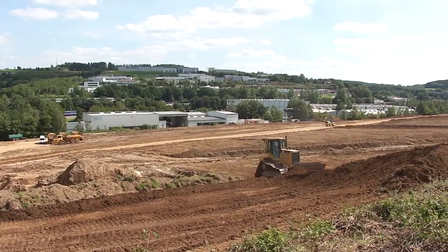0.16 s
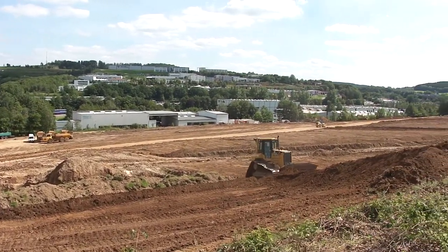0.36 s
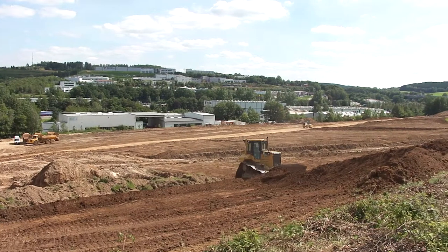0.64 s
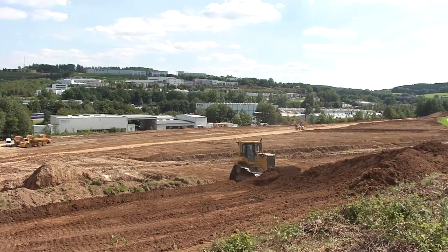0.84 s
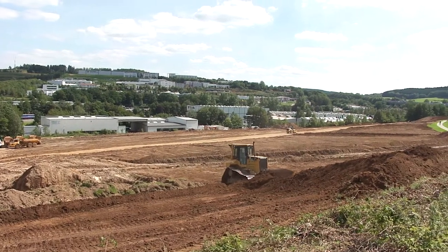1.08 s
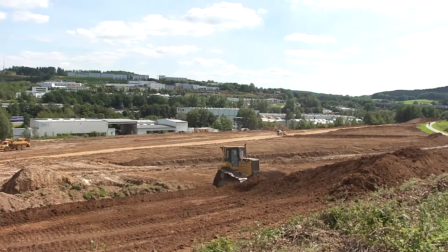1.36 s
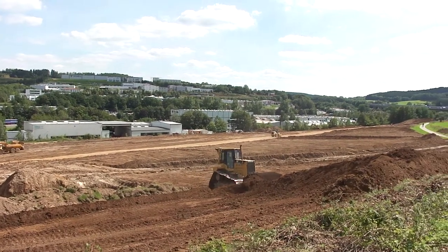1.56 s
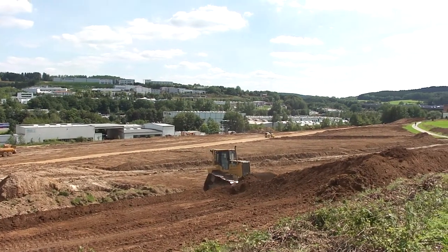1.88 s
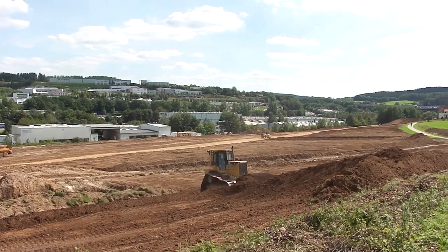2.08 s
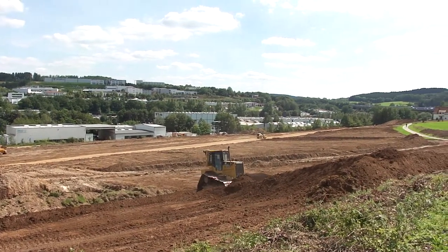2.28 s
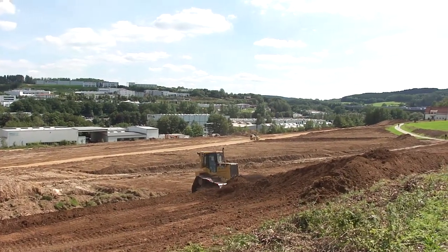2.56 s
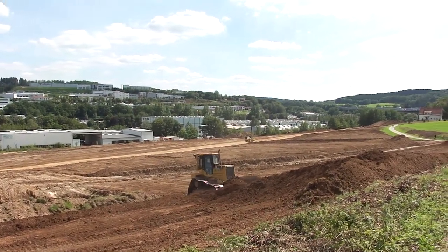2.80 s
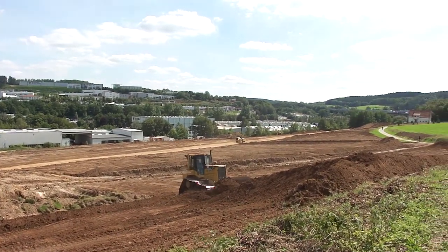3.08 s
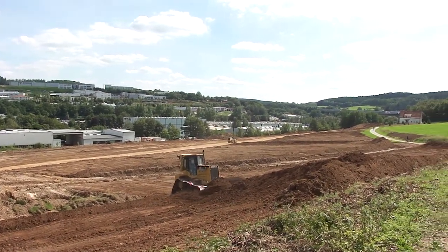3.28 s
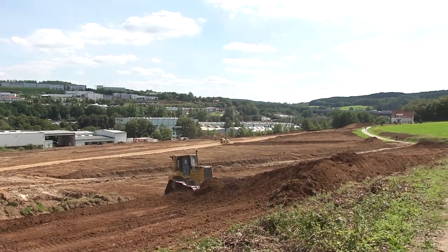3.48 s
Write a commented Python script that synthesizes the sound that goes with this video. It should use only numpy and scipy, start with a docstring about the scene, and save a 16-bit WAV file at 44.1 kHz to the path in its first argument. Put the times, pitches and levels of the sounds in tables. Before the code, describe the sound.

A bulldozer works throughout, some way off on open ground: a broad diesel roar with a slightly sagging low hum, clatter and airy hiss. From about 0.2 to 1.2 s the tracks give a rough groan sliding down in pitch. Wind gusts buffet the stereo microphone, with hard, blunted low thumps mainly on the right, densest around 0.7-1.5 and 1.9-2.8 s, then sparser, leaving the engine clearer. Faint recorder hiss fades beneath.

```python
"""Bulldozer on a windy site

An open site, with a bulldozer pushing soil some way off and a microphone with two ports out in the wind.
The diesel hum is sine orders of a slowly sagging firing rate, under a broad roar, clatter and hiss of
shaped noise, weak from 3 to 5 kHz. The tracks give one brief falling groan, a gliding tone with a fifth
and an octave. Wind buffets the ports in noise gusts and thumps the right one with bursts of a few cycles.
The hardest thumps are rounded off, an equaliser cuts three notches, and the level ducks just after loud
peaks. Thin recorder hiss lies beneath."""
import sys
import numpy as np
from scipy import signal
from scipy.fft import rfft, irfft, next_fast_len
from scipy.io import wavfile
from scipy.ndimage import uniform_filter1d, map_coordinates

SR = 44100
rng = np.random.default_rng(int(sys.argv[2]) if len(sys.argv) > 2 else 0)


def dump(signal):
    """Clip the signal to [-1, 1] and save it as 16-bit WAV at the path in sys.argv[1]."""
    limited = np.clip(np.atleast_2d(signal).T, -1, 1)
    pcm = np.round(limited * 32767).astype(np.int16)
    wavfile.write(sys.argv[1], SR, pcm)


N = 160524  # samples


def amp(db):
    """dB to gain."""
    return 10 ** (np.asarray(db) / 20)


def unit(x):
    """Scaled to rms 1."""
    return x / np.sqrt(np.mean(x ** 2) + 1e-20)


def along(points, hz):
    """Values at hz, read between (f/Hz, value) points on a log axis."""
    f, v = np.transpose(points)
    return np.interp(np.log(hz + 1), np.log(f + 1), v)


def curves(rows):
    """One value per sample for each column after t/s."""
    s, *columns = np.transpose(rows)
    return [np.interp(np.arange(N) / SR, s, column) for column in columns]


def wobble(rate):
    """A smooth curve through random knots, rate knots a second."""
    knots = rng.standard_normal(int(N * 200 / SR) + 4)
    return map_coordinates(knots, [np.arange(N) * rate / SR])


def filtered(x, response):
    """x times a complex response of frequency, padded so that tails do not wrap round."""
    m = next_fast_len(N + SR // 2)
    return irfft(rfft(x, m) * response(np.fft.rfftfreq(m, 1 / SR)), m)[..., :N]


def rush(spectrum, patchy_db, channels):
    """Shaped noise of rms 1, its gain varying at random in patches of time and frequency."""
    z = signal.stft(rng.standard_normal((channels, N)), nperseg=1024)[2]
    field = rng.standard_normal(z.shape[1:])
    field = uniform_filter1d(field, size=2, axis=0)  # frequency bins
    field = uniform_filter1d(field, size=9, axis=1)  # frames, about 0.1 s
    x = signal.istft(z * amp(patchy_db * unit(field)), nperseg=1024)[1][:, :N]
    return unit(filtered(x, lambda hz: amp(along(spectrum, hz))))


# Sagging firing rate of the diesel: t/s, f/Hz
FIRING_RATE = [(0, 105.5), (1, 101.8), (2, 98), (3.64, 96.2)]
# Hum lines: multiple of the firing rate, level at start/dB, level at end/dB
HUM_ORDERS = [(1, -42.5, -47), (2, -42.5, -38), (2.5, -37.5, -41.5), (4, -49.5, -39.5), (7.5, -33.5, -40.5)]
WAVER_DB, WAVER_TURNS = 2.6, .05  # unsteadiness of the lines on their way through moving air


def hum():
    """Sine orders of the firing rate, wavering in level and phase."""
    firing_hz, = curves(FIRING_RATE)
    phase = 2 * np.pi * np.cumsum(firing_hz) / SR
    total = np.zeros(N)
    for order, start_db, end_db in HUM_ORDERS:
        level_db = np.linspace(start_db, end_db, N) + WAVER_DB * wobble(4.68)
        waver = 2 * np.pi * WAVER_TURNS * np.sqrt(order) * wobble(6.23)
        total += np.sqrt(2) * amp(level_db) * np.sin(order * phase + waver)
    return total, phase


# The working machine: t/s, exhaust roar level/dB, mechanical clatter level/dB, hiss level/dB
WORK_LEVELS = [(0.0, -24.5, -29.5, -43.5), (0.03, -24.5, -27.5, -42), (0.6, -24, -24.5, -39),
               (1.07, -27.5, -25.5, -37.5), (1.15, -24, -23, -34), (1.51, -28, -27.5, -39),
               (1.65, -25, -25, -37), (2.09, -25.5, -25.5, -37), (2.15, -30.5, -29, -41),
               (2.25, -27.5, -26.5, -38.5), (3.55, -27, -24.5, -35), (3.64, -28, -26, -33.5)]
# Relative noise spectra of roar, clatter and hiss: f/Hz, level/dB per Hz
ROAR_SPECTRUM = [(15, -70), (50, -34), (90, -11.5), (150, -12.5), (200, -10.5), (280, -17), (400, -11.5),
                 (500, -10.5), (600, -5.5), (680, -3.5), (780, -2), (880, -9), (1000, -15.5), (1300, -22.5),
                 (2200, -120)]
CLATTER_SPECTRUM = [(530, -16.5), (900, -2.5), (1100, 1), (1400, 1.5), (1480, -3.5), (1620, -7.5),
                    (1900, -2.5), (2300, -9), (2600, -15.5), (2850, -27), (3300, -28), (4800, -31.5),
                    (5300, -78), (8000, -120)]
HISS_SPECTRUM = [(4600, -87), (5150, -15.5), (5430, -5.5), (5900, -1), (7000, 1), (7500, 0.5), (8500, -6),
                 (9300, -11), (11000, -16.5), (14000, -120)]
PULSING = .05  # depth to which the noise swells with each firing, as a share of its gain


def engine_noise(phase):
    """Roar, clatter and hiss: noise bands that swell with each firing."""
    roar_db, clatter_db, hiss_db = curves(WORK_LEVELS)
    shared_db = 0.26 * wobble(6.1)
    roar = amp(roar_db + 0.84 * wobble(18)) * rush(ROAR_SPECTRUM, patchy_db=1.0, channels=2)
    clatter = amp(clatter_db + 0.33 * wobble(16)) * rush(CLATTER_SPECTRUM, patchy_db=1.7, channels=2)
    hiss = amp(hiss_db + 0.48 * wobble(18)) * rush(HISS_SPECTRUM, patchy_db=2.0, channels=2)
    beat = 1 + PULSING * np.cos(phase)
    return beat * amp(shared_db) * (roar + clatter + hiss)


def engine():
    """The diesel, as a direct and a scattered part: the hum is all direct, the noise is in both."""
    hum_tone, phase = hum()
    return engine_noise(phase) + hum_tone * [[1], [0]]


# Groan from the tracks: t/s, f/Hz, level/dB, level of its fifth/dB, level of its octave/dB
GROAN_GLIDE = [(0, 800, -39, -63, -35), (.22, 755, -40, -30.5, -43), (.48, 720, -28, -38.5, -42),
               (.57, 712, -37, -40, -33), (.62, 703, -27, -38, -35), (.76, 690, -27, -34, -34),
               (.82, 670, -30, -49, -53), (.92, 648, -32, -50, -28), (1.02, 620, -38, -42, -58),
               (1.11, 598, -28.5, -44, -49), (1.3, 590, -42, -55, -55)]
GROAN_TURNS, FIFTH_TURNS = .14, .45  # phase roughness of the tone and of its fifth


def groan():
    """A slightly rough tone with a rougher fifth and octave, sliding down; all direct sound."""
    hz, db, fifth_db, octave_db = curves(GROAN_GLIDE)
    phase = 2 * np.pi * (np.cumsum(hz) / SR + GROAN_TURNS * wobble(24.7))
    fifth = np.sin(3 * phase / 2 + 2 * np.pi * FIFTH_TURNS * wobble(40))
    octave = np.sin(2 * phase + np.pi * FIFTH_TURNS * wobble(45.2))
    tone = amp(db) * np.sin(phase) + amp(fifth_db) * fifth + amp(octave_db) * octave
    return np.sqrt(2) * amp(3 * wobble(25)) * tone * [[1], [0]]


# Gusts at the microphone: start t/s, end t/s, right port level/dB, left port level/dB
GUST_TIMES = [(0, 0.106, -19, -33), (0.133, 0.6, -38.5, -60), (.64, 1.05, -22, -39),
              (1.064, 1.337, -20, -45), (1.366, 1.541, -18, -32), (1.576, 1.88, -50, -67),
              (1.89, 1.98, -24, -37), (2.005, 2.229, -21, -34.5), (2.255, 2.609, -23.5, -35.5),
              (2.648, 2.882, -26, -32), (2.903, 3.17, -48, -55), (3.183, 3.403, -30.5, -40),
              (3.425, 3.64, -46, -38.5)]
# Relative spectrum of the buffeting: f/Hz, level/dB per Hz
BUFFET_SPECTRUM = [(15, -70), (40, -16), (130, -0.5), (250, 0.5), (380, -7.5), (550, -7), (800, -32),
                   (1200, -25), (2400, -120)]
GUST_EDGE_S, LUMPY_DB = .021, 2  # fade centred on each gust's start and end; random unevenness
SWELL_S, BETWEEN = .014, 1.5  # the buffeting swells around each thump over this steady share
# Thumps on the right port: t/s, level/dB, f/Hz
PORT_THUMPS = [(0.049, -7.5, 260), (0.069, -6, 282), (0.093, -14, 438), (0.173, -17, 240),
               (0.334, -20, 281), (0.362, -21, 294), (0.375, -22, 239), (0.704, -12, 280),
               (0.711, -16, 369), (0.789, -5.5, 328), (0.803, -12, 252), (0.842, -22, 238),
               (0.858, -21, 260), (0.907, -11, 256), (0.939, -21, 258), (0.979, -5, 326),
               (1.003, -8.5, 248), (1.223, -10, 256), (1.245, -3, 476), (1.367, -8, 305), (1.372, -6, 291),
               (1.382, -3.5, 330), (1.425, -7, 314), (1.437, -16, 320), (1.45, -13, 322), (1.459, -18, 275),
               (1.473, -25, 245), (1.515, -19, 408), (1.521, -21, 230), (1.926, -12, 205),
               (1.939, -10, 221), (2.056, -8, 422), (2.069, -17, 316), (2.114, -9, 334), (2.137, -13, 270),
               (2.15, -18, 322), (2.193, -10, 300), (2.199, -10, 249), (2.267, -10.5, 416),
               (2.31, -18, 269), (2.32, -7, 283), (2.326, -6.5, 270), (2.355, -8, 308), (2.428, -11, 283),
               (2.477, -8, 290), (2.573, -23, 324), (2.603, -13, 176), (2.695, -10, 338), (2.708, -9, 249),
               (2.754, -18, 273), (2.773, -16, 393), (3.208, -14, 360), (3.322, -12, 273),
               (3.337, -14, 337)]
THUMP_CYCLES, SNAP_DB = .9, -12  # half-length of a thump; level of the shorter, higher snap in it
WIND_LEAK = -.3  # the right port's wind, inverted, in the left channel


def wind_thumps():
    """Bursts of a few cycles at the right port, and the swells they bring to the buffeting."""
    u = np.arange(-1500, 1500) / SR  # s around each thump
    thumps, swells = np.zeros((2, N + len(u)))
    for (s, db, hz), turn in zip(PORT_THUMPS, rng.random(len(PORT_THUMPS))):
        w = 2 * np.pi * (hz * u + turn)
        shape = np.exp(-(u * hz / THUMP_CYCLES) ** 2)
        snap = amp(SNAP_DB) * shape ** 5 * np.sin(1.73 * w)
        start = round(s * SR)
        thumps[start:][:len(u)] += amp(db) * (shape * np.sin(w) + snap)
        swells[start:][:len(u)] += np.exp(-(u / SWELL_S) ** 2)
    middle = len(u) // 2
    return thumps[middle:][:N], swells[middle:][:N]


def wind():
    """Lumpy low noise during gusts at both ports, with the thumps on the right."""
    t = np.arange(N) / SR
    gust = np.zeros((2, N))
    for start, end, right_db, left_db in GUST_TIMES:
        fade = np.clip(np.minimum(t - start, end - t) / GUST_EDGE_S + .5, 0, 1)
        gust += amp([[left_db], [right_db]]) * fade
    thumps, swells = wind_thumps()
    lumps = amp(LUMPY_DB * np.array([wobble(29.4), wobble(30.02)])) * (BETWEEN + swells)
    left, right = gust * unit(lumps * rush(BUFFET_SPECTRUM, patchy_db=1, channels=2))
    right = right + thumps
    return np.array([left + WIND_LEAK * right, right])


# Thin recorder hiss: relative spectrum as f/Hz, level/dB; then its level/dB at start and end
RECORDER_HISS_SPECTRUM = [(3500, -25), (4700, 4), (5500, 10), (7500, -3), (9000, -4), (10200, 13),
                          (11100, -17), (11500, -19), (13000, -60)]
RECORDER_HISS_DB = [-44, -58.5]


def recorder_hiss():
    """Patchy high noise that fades steadily in dB."""
    return amp(np.linspace(*RECORDER_HISS_DB, N)) * rush(RECORDER_HISS_SPECTRUM, patchy_db=4, channels=2)


# Left port over right: f/Hz, level/dB
LEFT_OVER_RIGHT = [(500, 0), (700, 1), (1200, 1.4), (1550, 2.7), (2240, 5.5), (2700, 3), (3000, 0),
                   (4900, 0), (5400, 7), (6200, 9.5), (6900, 9.3), (7900, 5), (9000, 0), (9700, -1.5),
                   (11000, 3)]
# Left port behind right: f/Hz, lag/rad
LEFT_LAG = [(300, 0), (700, -.08), (1200, -.09), (1500, -.2), (1720, 0), (2250, .45), (2700, .6), (3000, 0),
            (5400, 0), (6200, .5), (6900, 1.15), (7900, 1.8), (9000, 2), (9700, 2.6), (11000, 5.5)]
# How alike the two channels are: f/Hz, likeness (1 = the same)
LIKENESS = [(60, .7), (170, .75), (340, .93), (700, .985), (1400, .975), (1700, .86), (1950, .9),
            (2700, .8), (3050, .99), (4900, .995), (5300, .75), (6800, .86), (8000, .7), (9700, .45),
            (11000, .5)]


def placed(pair):
    """A direct and a scattered part spread over the two channels, with level and phase offsets."""
    def shares(hz):
        turn = np.arccos(np.clip(along(LIKENESS, hz), 0, 1)) / 2
        return np.array([np.cos(turn), np.sin(turn)])

    def port_responses(hz):
        half = amp(along(LEFT_OVER_RIGHT, hz) / 2) * np.exp(-.5j * along(LEFT_LAG, hz))
        return np.array([half, 1 / half])

    mid, side = filtered(pair, shares)
    return filtered(np.array([mid + side, mid - side]), port_responses)


def scene():
    """Machine, wind and recorder hiss in two channels."""
    return placed(engine() + groan() + recorder_hiss()) + wind()


# Centres of the equaliser's notches: f/Hz
NOTCH_CENTRES = [2995, 3995, 4980]
NOTCH_WIDTH_HZ = 80  # distance from the centre where each of three passes is 3 dB down
CLIP_TOP, CLIP_HARD = .8, 6  # input ceiling as a share of full scale; sharpness of the bend
DUCK_FROM_DB, DUCK_SHARE = -8, .5  # threshold; dB of ducking per dB above it
DUCK_ATTACK_S, RECOVER_DB_PER_S = .012, 90  # ducking is averaged over this; fall of the held peak
LOW_CUT_HZ, TOP_HZ = 89, 11600


def notches(hz):
    """The equaliser's three narrow cuts, each made by three passes of one filter."""
    cuts = [1j * (hz - c) / (NOTCH_WIDTH_HZ + 1j * (hz - c)) for c in NOTCH_CENTRES]
    return np.prod(cuts, axis=0) ** 3


def band_limits(hz):
    """Second-order low cut and a sheer upper limit."""
    return (hz < TOP_HZ) * (1j * hz / (LOW_CUT_HZ + 1j * hz)) ** 2


def gain_control(x):
    """Both channels ducked together just after peaks, recovering as the held peak falls."""
    peak_db = 20 * np.log10(np.abs(x).max(axis=0) + 1e-6)
    ramp_db = RECOVER_DB_PER_S * np.arange(N) / SR
    held_db = np.maximum.accumulate(peak_db + ramp_db) - ramp_db
    attack = round(DUCK_ATTACK_S * SR)
    target_db = -DUCK_SHARE * np.maximum(held_db - DUCK_FROM_DB, 0)
    duck_db = np.convolve(target_db, np.ones(attack) / attack)[:N]
    return x * amp(duck_db)


def record(dry):
    """Soft clipping at the input, the equaliser's notches, gain control, then the band limits."""
    x = dry / (1 + np.abs(dry / CLIP_TOP) ** CLIP_HARD) ** (1 / CLIP_HARD)
    x = filtered(x, notches)
    return filtered(gain_control(x), band_limits)


dry = scene()
out = record(dry)
dump(out)
```